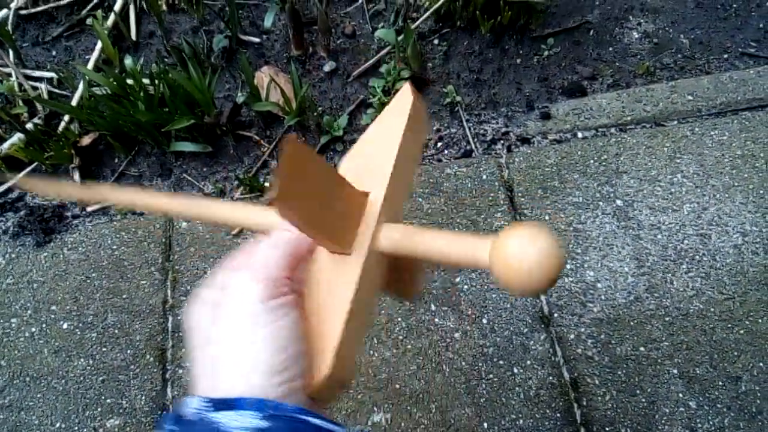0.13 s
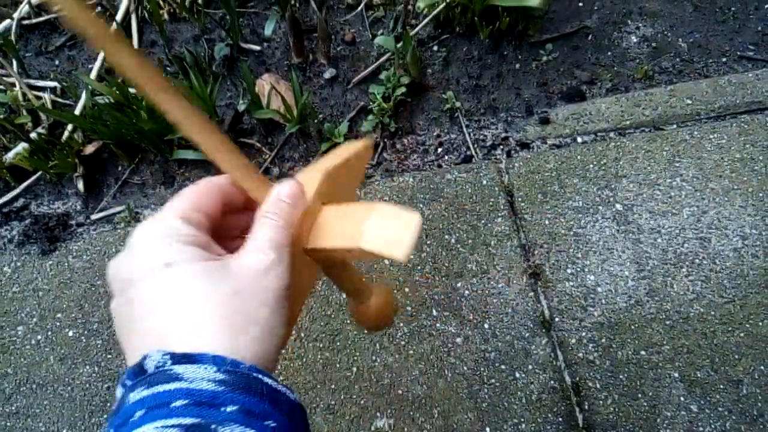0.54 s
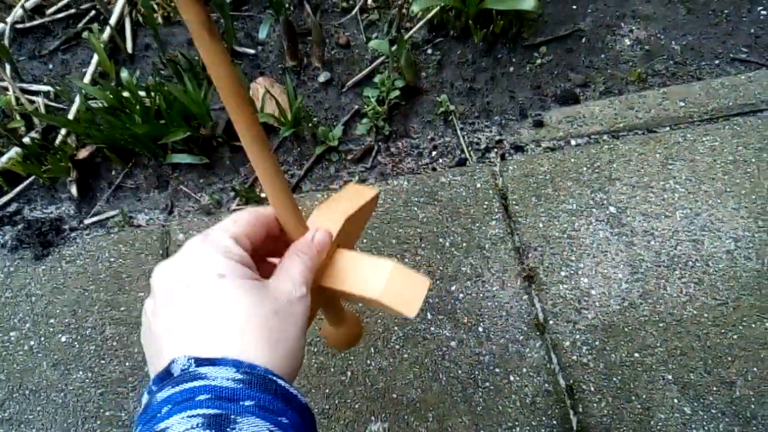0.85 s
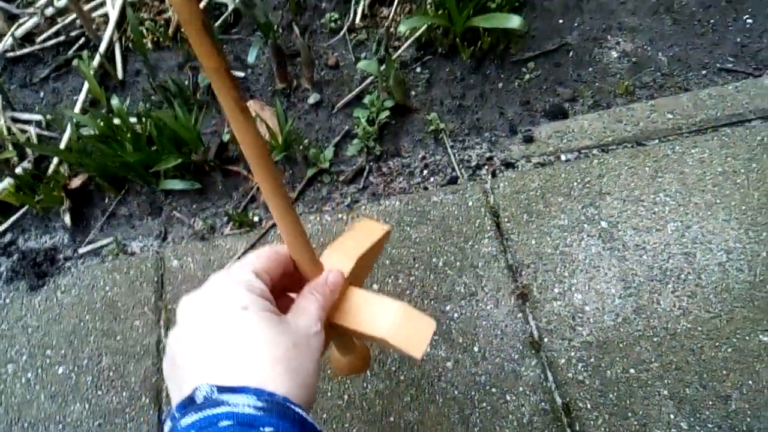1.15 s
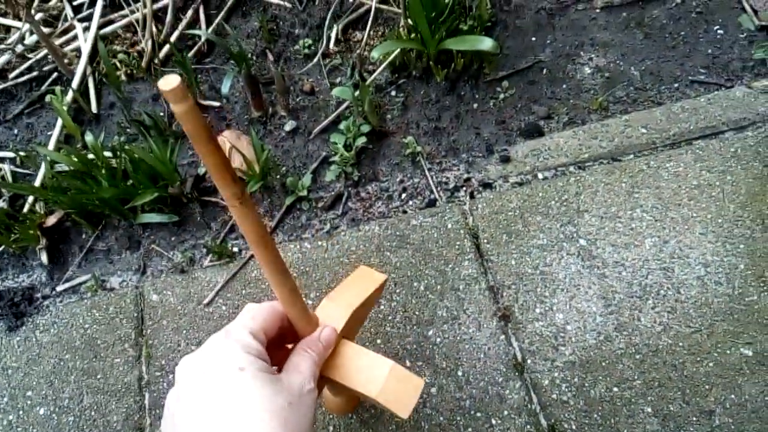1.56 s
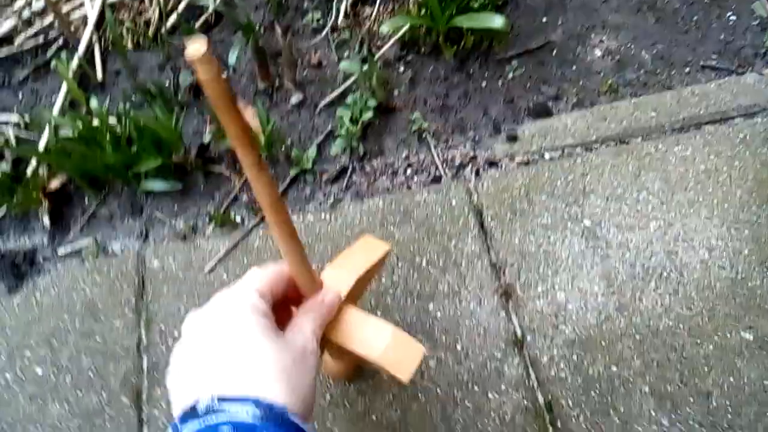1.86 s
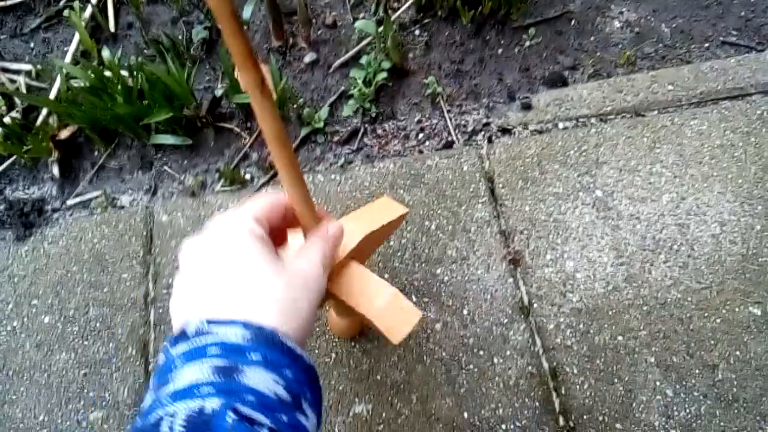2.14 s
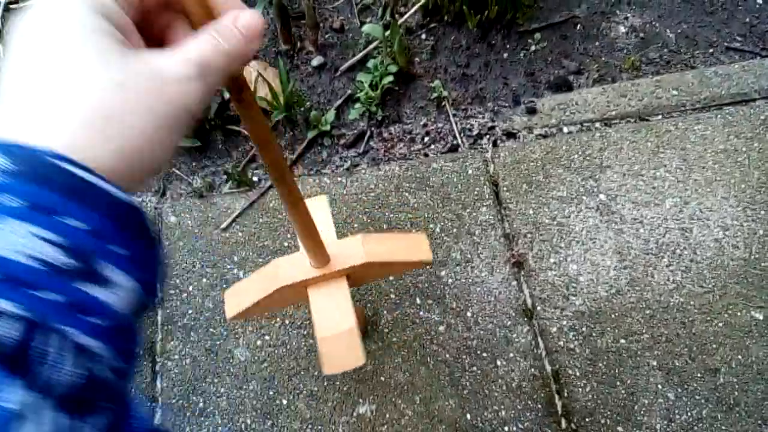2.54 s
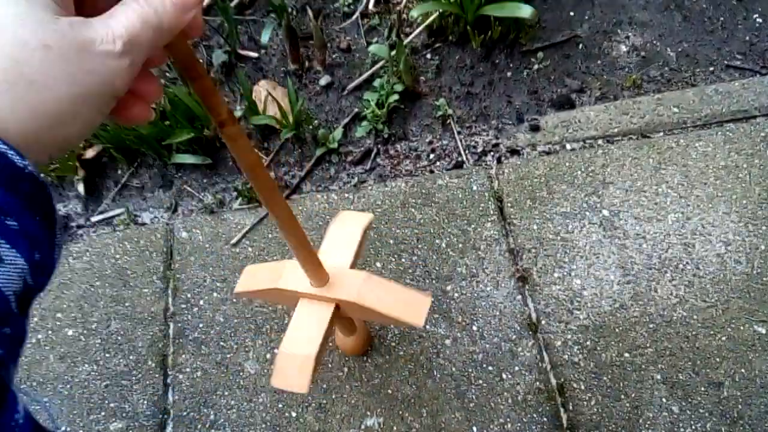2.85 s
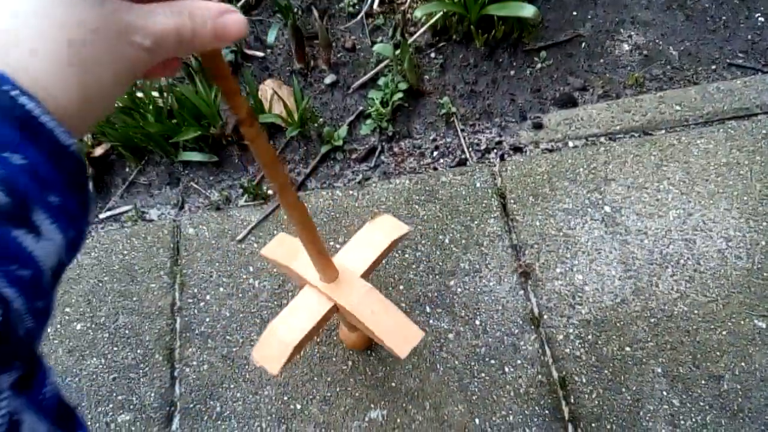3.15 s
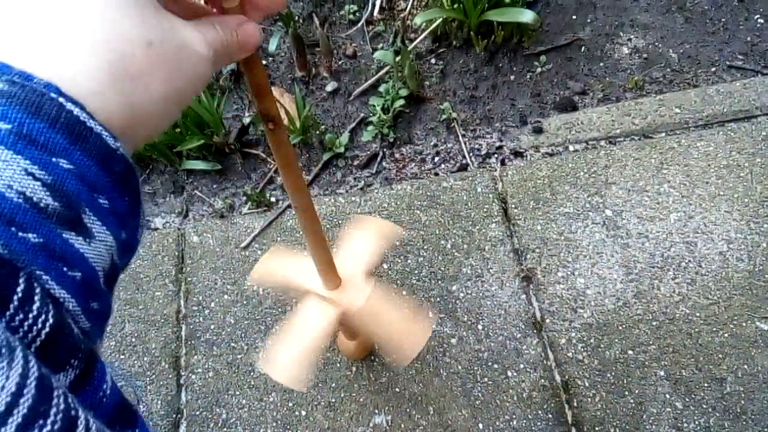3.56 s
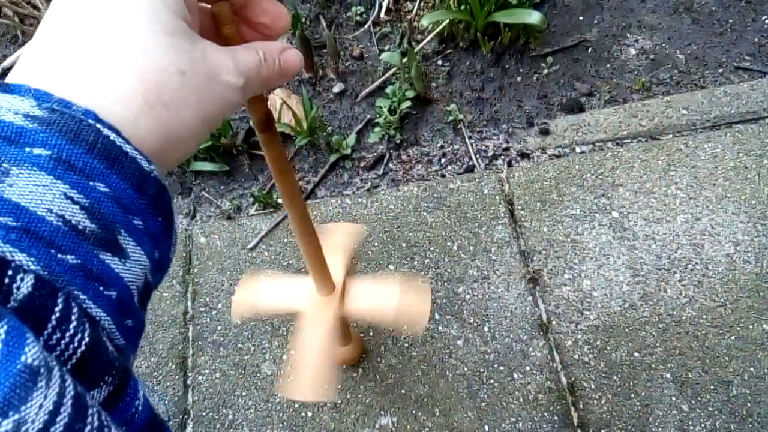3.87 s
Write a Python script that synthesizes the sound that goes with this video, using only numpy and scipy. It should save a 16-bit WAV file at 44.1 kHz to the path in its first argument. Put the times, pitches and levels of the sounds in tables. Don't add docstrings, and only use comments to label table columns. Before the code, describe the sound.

A wooden spindle on garden paving, heard close. Faint air hiss and low wind; a far hoarse bird whistle at 0-0.45 s, a weak chip and fainter whistle around 0.6-0.8. The knob scuffs stone at 1.4, drags faintly, then knocks dry and hard at 1.94 with tiny quick bounces. Sliding fingers squeak thinly, 2.15-2.55; barely audible rubs follow as low wind thuds swell from 2.9 to 4.

```python
import sys
import numpy as np
from scipy import signal
from scipy.fft import rfft, irfft
from scipy.io import wavfile
from scipy.ndimage import uniform_filter1d

SR = 44100
rng = np.random.default_rng(int(sys.argv[2]) if len(sys.argv) > 2 else 0)


def field_ratio(decibels):
    return 10 ** (np.asarray(decibels, dtype=float) / 20)


def transcribe(signal):
    frames = np.atleast_2d(signal).T
    limited = np.clip(frames, -1, 1)
    pcm = np.round(limited * 32767).astype(np.int16)
    wavfile.write(sys.argv[1], SR, pcm)


N = 176400


def unit(x):
    return x / np.sqrt(np.mean(x ** 2))


def band(x, hz, width_hz):
    hz = min(hz, 0.45 * SR)
    return signal.lfilter(*signal.iirpeak(hz, hz / max(width_hz, 5), fs=SR), x)


def smooth_twice(x, span):
    return uniform_filter1d(uniform_filter1d(x, span), span)


def even(x, span_s):
    return x / np.sqrt(smooth_twice(x ** 2, int(span_s * SR)))


def walk(rate_hz):
    hold = int(SR / rate_hz)
    levels = np.repeat(rng.standard_normal(N // hold + 1), hold)
    return 1.3 * smooth_twice(levels, hold)[:N]


def curve(rows, column, outside=None):
    rows = np.array(rows, float)
    return np.interp(np.arange(N) / SR, rows[:, 0], rows[:, column], outside, outside)


def swell(start_s, length_s, attack_s):
    t = np.arange(N) / SR - start_s
    rise = np.clip(t / attack_s, 0, 1)
    return rise * np.clip(1 - t / (length_s + attack_s), 0, 1) ** 0.6


def slips(rate_hz, spread_db):
    chance = rng.random((3, N))
    clicks = (chance[0] < rate_hz / SR) * np.sign(chance[1] - 0.5)
    return unit(clicks * field_ratio(-spread_db * np.log(chance[2] + 1e-9)))


# (time [s], thud level [dB], flutter over thud [dB])
GUSTS = [(0, -58.5, -1.5), (.55, -60, 0), (.75, -60, 5.5), (1.3, -61, -3), (1.42, -45.5, -1.5),
         (1.58, -46.5, 0.5), (1.84, -59.5, 5), (2.07, -53.5, 2), (2.15, -63, -1), (2.35, -55.5, -3.5),
         (2.9, -56, 4.5), (2.94, -40.5, -1), (3.18, -38.5, -21), (3.21, -44, -10), (3.62, -49, -8.5),
         (3.67, -35.5, 1), (3.77, -39, -23.5), (3.9, -32.5, -22)]
# (time [s], half length [s], pitch [Hz], peak [dB])
EDDIES = [(1.68, 0.037, 61, -41.5), (3.03, 0.004, 74, -23), (3.395, 0.007, 84, -31),
          (3.432, 0.011, 80, -26), (3.458, 0.0087, 159, -37.5), (3.463, 0.016, 70.6, -24),
          (3.58, 0.016, 80, -40.5), (3.661, 0.012, 304, -41), (3.668, 0.011, 78.7, -21.5),
          (3.69, 0.0049, 169, -18.5), (3.721, 0.0068, 88, -26), (3.85, .015, 112, -29),
          (3.955, 0.0065, 90, -18.5), (3.999, 0.0056, 82, -17.5)]


def wind():
    thud_hz, thud_width_hz = 80, 62
    flutter_hz, flutter_width_hz, top_hz = 171, 134, 339.4
    buffets_hz, thud_patchy_db, flutter_patchy_db = 28, 1.5, 2.0
    t = np.arange(N) / SR
    thud = band(rng.standard_normal(N), thud_hz, thud_width_hz)
    thud = even(band(thud, thud_hz, 2 * thud_width_hz), 0.093)
    thud = thud * field_ratio(thud_patchy_db * walk(buffets_hz))
    flutter = even(band(rng.standard_normal(N), flutter_hz, flutter_width_hz), 0.036)
    flutter = flutter * field_ratio(flutter_patchy_db * walk(buffets_hz))
    out = field_ratio(curve(GUSTS, 1)) * (thud + field_ratio(curve(GUSTS, 2)) * flutter)
    out = signal.sosfilt(signal.butter(8, top_hz, fs=SR, output="sos"), out)
    for start_s, half_s, hz, db in EDDIES:
        since = t - start_s
        out = out + field_ratio(db) * np.exp(-(since / half_s) ** 2) * np.cos(2 * np.pi * hz * since)
    return out


# (frequency [Hz], density [dB per Hz])
AIR = [(210, -41), (350, -5.5), (884, -3), (1400, -9.5), (2000, -10.5), (3130, -16), (6080, -18),
       (7910, -25.5), (14000, -29)]


def air():
    level_db, patchy_db, patch_rate_hz = -74, 2.5, 14
    capsule_hz, capsule_width_hz, capsule_db = 14800, 1200, 6.5
    duck_db_per_db, duck_from_db = 0.13, -46
    hz = np.maximum(np.arange(N // 2 + 1) * SR / N, 1)
    table = np.array(AIR)
    colour_db = np.interp(np.log(hz), np.log(table[:, 0]), table[:, 1])
    colour = rfft(rng.standard_normal(N)) * field_ratio(colour_db) * (hz > 300)
    place = np.clip(4 * np.log2(hz / 350), 0, 17)
    hiss = np.zeros(N)
    for k in range(18):
        patch = irfft(colour * np.sqrt(np.clip(1 - np.abs(place - k), 0, 1)), N)
        hiss += patch * field_ratio(patchy_db * (k < 17) * walk(patch_rate_hz))
    hiss = unit(hiss)
    hiss = hiss + field_ratio(capsule_db) * band(hiss, capsule_hz, capsule_width_hz)
    duck_db = duck_db_per_db * np.maximum(curve(GUSTS, 1) - duck_from_db, 0)
    return hiss * field_ratio(level_db - duck_db)


# (time [s], pitch [Hz], level [dB])
WHISTLE = [(0, 2085, -71), (.065, 2050, -69), (.1, 2130, -77), (.16, 2240, -69), (.26, 2230, -71),
           (.31, 2040, -75), (.36, 1990, -76), (.41, 1970, -79), (.45, 1950, -95)]
# (time [s], pitch [Hz], level [dB])
WHISTLE_AGAIN = [(.6, 2250, -98), (.64, 2250, -82), (.77, 2215, -82), (.8, 2200, -98)]
# (pitch ratio [1], level [dB])
STRANDS = [(1.0, -2.5), (.955, -11), (1.05, -10)]


def birds():
    wobble, patchy_db = 0.014, 5.0
    chip_s, chip_hz, chip_db, chip_half_s = 0.582, 3210, -65.5, 0.0053
    t = np.arange(N) / SR
    chip_shape = np.exp(-((t - chip_s) / chip_half_s) ** 2)
    out = field_ratio(chip_db) * chip_shape * np.sin(2 * np.pi * chip_hz * t)
    for call in (WHISTLE, WHISTLE_AGAIN):
        for ratio, strand_db in STRANDS:
            hz = curve(call, 1) * (ratio + wobble * walk(120))
            db = curve(call, 2, outside=-140) + strand_db + patchy_db * walk(70)
            out = out + np.sqrt(2) * field_ratio(db) * np.sin(2 * np.pi * np.cumsum(hz) / SR)
    return out


# (time [s], lowest mode level [dB], upper modes level [dB])
SLIDE = [
    (2.14, -90, -99),
    (2.19, -69, -86),
    (2.26, -72.5, -76.5),
    (2.298, -85, -75.5),
    (2.33, -69.5, -74),
    (2.37, -62.5, -70.5),
    (2.4, -68, -73),
    (2.525, -74, -82.5),
    (2.55, -95, -87),
]
# (frequency [Hz], width [Hz], level [dB])
SHAFT = [(3060, 65, 0), (3690, 50, -15), (4890, 90, -15), (5900, 55, -6), (6510, 50, -18), (6980, 200, -16),
         (8250, 90, -19), (9260, 110, -19), (11900, 90, -19), (13400, 80, -26), (14300, 500, -28),
         (15200, 600, -18)]
# (time [s], length [s], level [dB])
RUBS = [(2.602, .06, -77.5), (2.8, .12, -79.5), (3.13, .05, -81), (3.35, .04, -80.5), (3.683, 0.037, -77.5),
        (3.75, .04, -81), (3.89, .05, -80)]
# (time [s], length [s], frequency [Hz], level [dB])
CATCHES = [(0.562, .04, 1860, -73.5), (1.415, 0.035, 2670, -67.5), (1.418, 0.034, 4700, -73),
           (1.496, 0.13, 1820, -74.5), (1.593, 0.062, 1600, -66.5), (1.616, 0.038, 1906, -64.5),
           (1.66, 0.021, 1750, -68.5), (2.118, 0.11, 1460, -76), (2.263, 0.061, 4880, -74.5),
           (2.397, .06, 3670, -77), (2.426, 0.096, 1810, -76.5), (2.629, 0.058, 3950, -76),
           (2.836, 0.064, 4870, -80), (3.055, 0.11, 1750, -76.5), (3.665, .02, 3880, -77.5)]


def shaft():
    grip_patchy_db, catch_width_hz = 2.5, 51
    firm_from_db, firm_above_hz, firm_slope = -70.5, 7500, 0.81
    drive = slips(4000, 2.0)

    def ring(hz, width_hz, span_s):
        return even(band(band(drive, hz, 1.5 * width_hz), hz, 4 * width_hz), span_s)

    low = ring(SHAFT[0][0], SHAFT[0][1], 0.03)
    firm_db = firm_slope * np.clip(curve(SLIDE, 2) - firm_from_db, -20, 0)
    upper = np.zeros(N)
    for hz, width_hz, db in SHAFT[1:]:
        mode_db = db + firm_db * (hz > firm_above_hz) + grip_patchy_db * walk(18)
        upper += field_ratio(mode_db) * np.sqrt(width_hz) * ring(hz, width_hz, 0.041)
    upper = unit(upper)
    out = field_ratio(curve(SLIDE, 1, outside=-140)) * low + field_ratio(curve(SLIDE, 2, outside=-140)) * upper
    for start_s, length_s, db in RUBS:
        out += field_ratio(db) * swell(start_s, length_s, 0.012) * (low + 0.32 * upper)
    for start_s, length_s, hz, db in CATCHES:
        out += field_ratio(db) * swell(start_s, length_s, 0.0046) * ring(hz, catch_width_hz, 0.029)
    return out


# (time [s], length [s], level [dB], brightness [dB per octave])
SCUFFS = [
    (1.386, .1, -59.5, -1),
    (1.444, 0.9, -78.5, 0.5),
]
# (frequency [Hz], width [Hz], level [dB])
SCUFFED = [(850, 330, -1), (1750, 700, -2), (2600, 580, -12.5), (3740, 420, -4.5), (4700, 220, -8),
           (5730, 500, -18)]


def scuffs():
    patchy_db = 2.5
    grit = slips(5000, 1.6)
    out = np.zeros(N)
    for start_s, length_s, level_db, tilt_db in SCUFFS:
        wood = np.zeros(N)
        for hz, width_hz, db in SCUFFED:
            mode_db = db + tilt_db * np.log2(hz / 1750) + patchy_db * walk(30.12)
            wood += field_ratio(mode_db) * band(band(grit, hz, width_hz), hz, 2 * width_hz)
        out += field_ratio(level_db) * swell(start_s, 1.33 * length_s, 0.003) ** 3 * unit(wood)
    return out


# (time [s], level [dB], contact [ms], brightness [dB per octave])
KNOCKS = [
    (1.9404, -27.5, 0.89, -0.9),
    (1.9516, -41.5, 0.6, 0.5),
    (1.967, -53, 0.54, 2),
]
# (frequency [Hz], level [dB], t60 [s])
WOOD = [(270, -5, .035), (560, -5, .012), (880, 0.1, .01), (1150, -2, .015), (1550, -8, .01),
        (2030, -5, .025), (2450, -8, .015), (2760, -6, .02), (3070, -20, .03), (3620, -21, .035),
        (4280, -32, .03), (5900, -19, .025), (6750, -29, .04), (15150, -29, .013)]


def knocks():
    brightest_hz = 6500
    wash_db, wash_t60_s, wash_hz, wash_width_hz = -33, 0.16, 2300, 2500
    out = np.zeros(N)
    t = np.arange(int(0.2 * SR)) / SR
    for start_s, level_db, contact_ms, tilt_db in KNOCKS:
        ring = np.zeros(len(t))
        for hz, db, t60_s in WOOD:
            gain = field_ratio(db + tilt_db * np.log2(min(hz, brightest_hz) / 1000))
            phase = 0.1 * rng.random()
            ring += gain * np.exp(-np.log(1000) * t / t60_s) * np.sin(2 * np.pi * (hz * t + phase))
        push = np.sin(np.pi / 2 * np.minimum(t / (contact_ms / 1000), 1)) ** 2
        ring = -ring * push
        wash = band(rng.standard_normal(len(t)), wash_hz, wash_width_hz)
        wash = unit(band(wash, wash_hz, wash_width_hz)) * np.exp(-np.log(1000) * t / wash_t60_s)
        i = int(start_s * SR)
        out[i:i + len(t)] += field_ratio(level_db) * (ring / np.abs(ring).max() + field_ratio(wash_db) * wash)
    return out


def scene():
    return (wind() + air() + birds() + shaft() + scuffs() + knocks())[None]


def band_limit(x):
    return signal.sosfilt(signal.butter(12, 15710, fs=SR, output="sos"), x)


def record(dry):
    low_cut_hz = 19.6
    mix = signal.sosfilt(signal.butter(2, low_cut_hz, "high", fs=SR, output="sos"), dry)
    return band_limit(mix)


dry = scene()
out = record(dry)
transcribe(out)
```